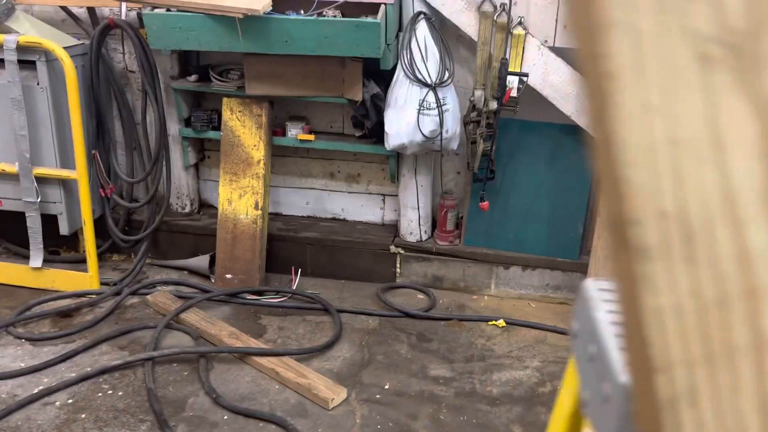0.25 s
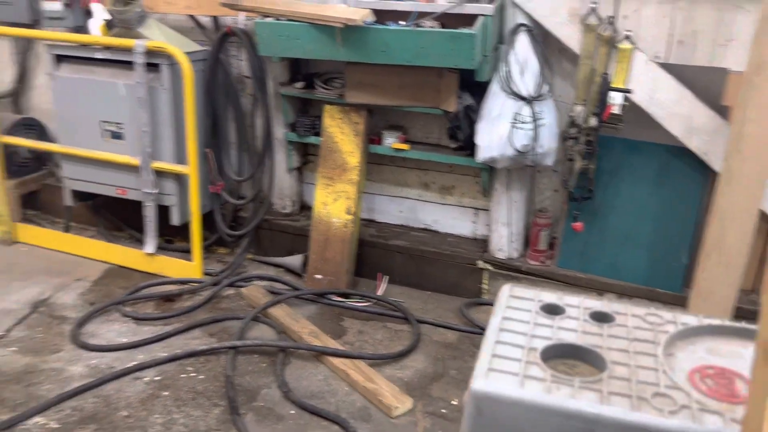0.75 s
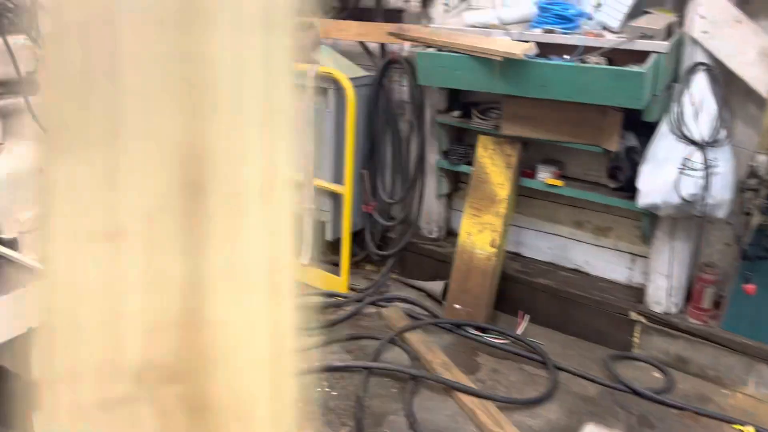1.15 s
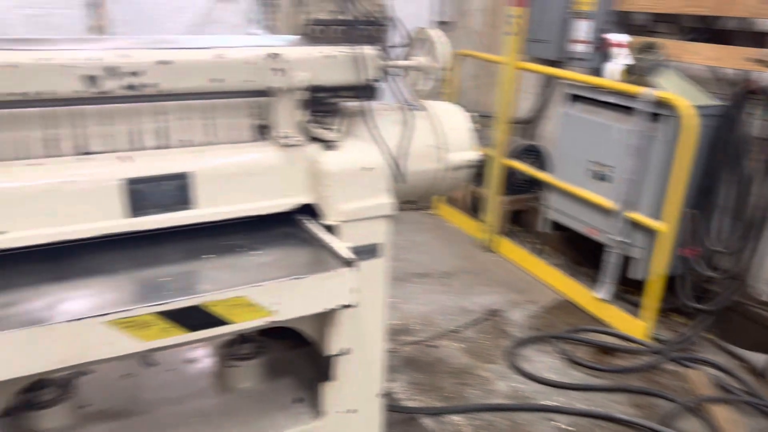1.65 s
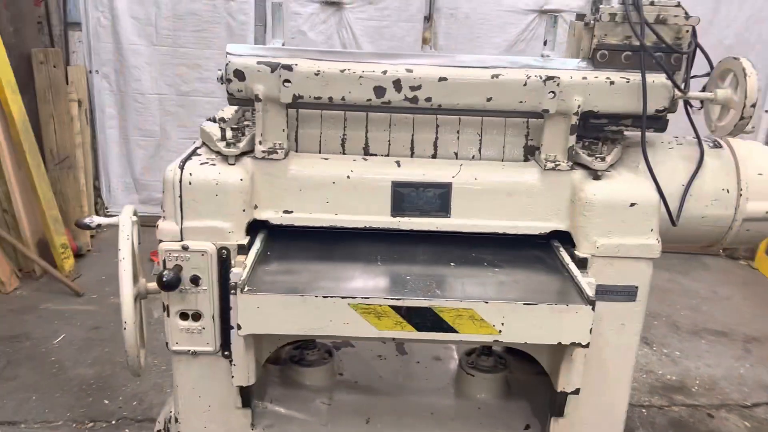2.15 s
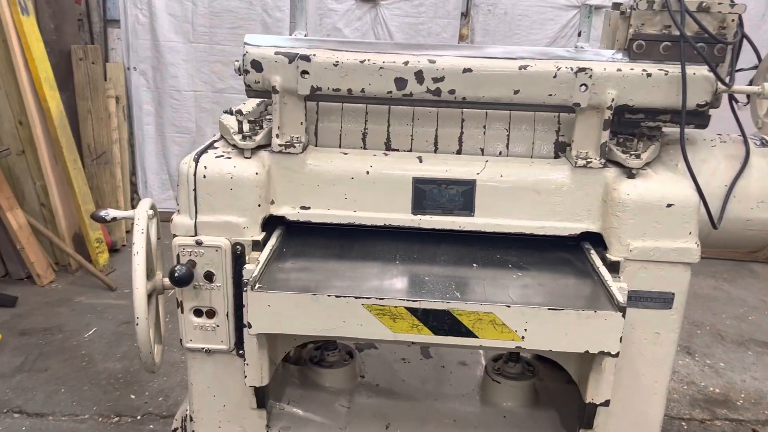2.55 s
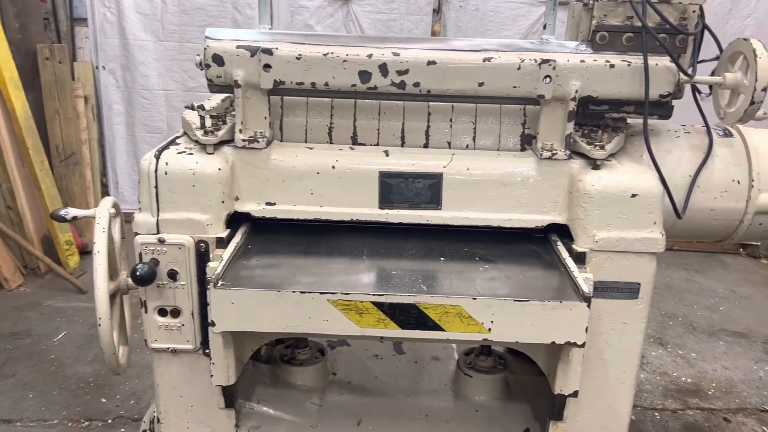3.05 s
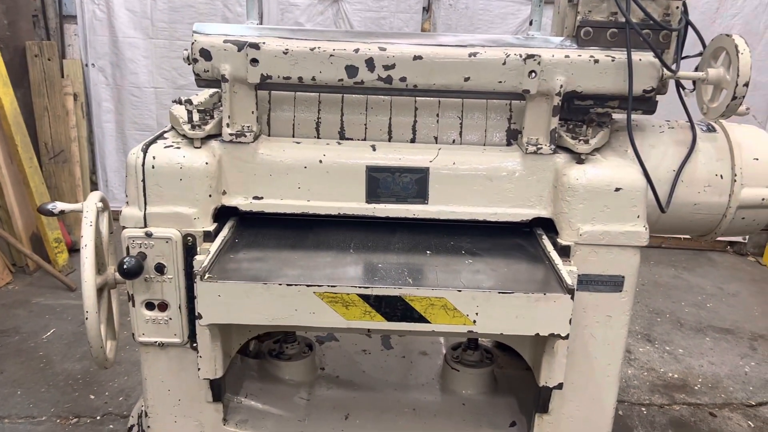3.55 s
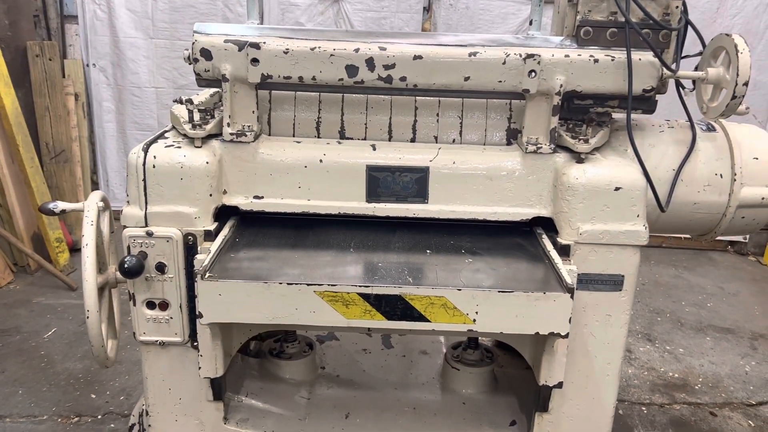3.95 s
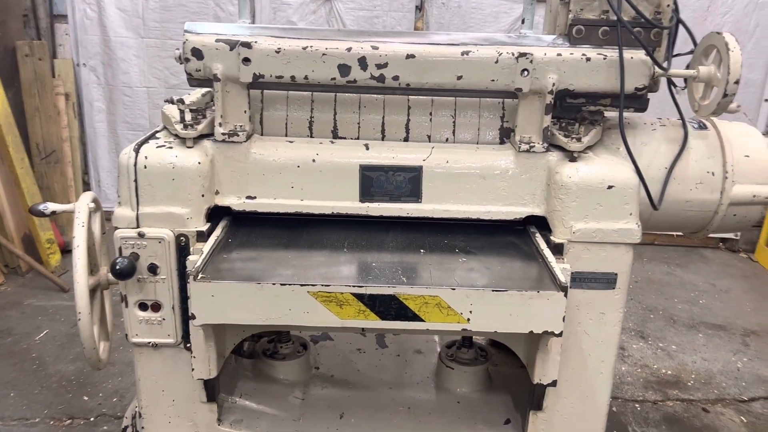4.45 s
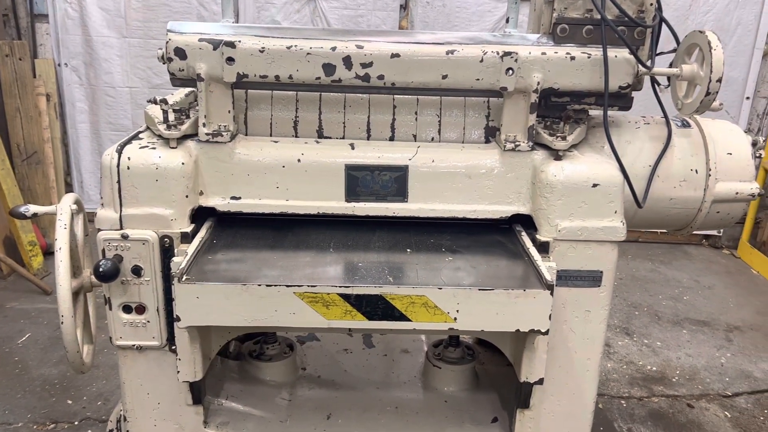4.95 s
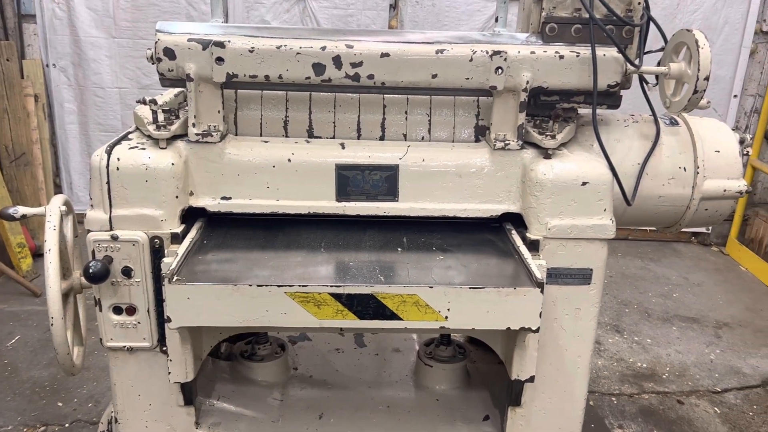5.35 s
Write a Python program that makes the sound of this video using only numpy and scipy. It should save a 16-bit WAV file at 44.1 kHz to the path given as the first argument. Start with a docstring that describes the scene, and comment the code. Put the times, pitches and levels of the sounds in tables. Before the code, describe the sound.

Steady low electric drone of an idling thickness planer in a workshop, airy and faintly whining, with a single soft plank knock near the start.

```python
"""A thickness planer idles in a workshop, heard by two microphones carried up to it.
At first the machine lies to the left: its hum and air are coloured by distance, and a thin whistle is loud.
At 0.6 s a wooden plank is knocked: a sum of decaying bending modes, soon stopped by the grip.
By 2.1 s the microphones face the machine: the knives' harmonics have moved to the centre through quiet
and loud spots. The hum stays, with shaft, motor and bearing tones over puffing, filtered noise for air."""
import sys
import numpy as np
from scipy import signal
from scipy.fft import rfft, irfft
from scipy.io import wavfile
from scipy.ndimage import uniform_filter1d

SR = 44100
rng = np.random.default_rng(int(sys.argv[2]) if len(sys.argv) > 2 else 0)


def persist_wave(psi):
    """Save psi, clipped to +-1, as 16-bit WAV."""
    counts = np.round(np.clip(psi, -1, 1) * 32767).astype(np.int16)
    wavfile.write(sys.argv[1], SR, np.atleast_2d(counts).T)


N = 247842
TIME = np.arange(N) / SR  # s
SHAFT_HZ = 59.74
KNIFE_HZ = 3 * SHAFT_HZ  # three knives pass the lip in each turn


def amp(db):
    """Decibels to gain."""
    return 10 ** (np.asarray(db) / 20)


def evened(x):
    """Scales to rms 1."""
    return x / np.sqrt(np.mean(abs(x) ** 2) + 1e-20)


def read(points, hz):
    """Reads a table of values against frequency on a logarithmic frequency axis."""
    f, value = np.transpose(points)
    return np.interp(np.log(hz + 1), np.log(f + 1), value)


def drift(rate_hz):
    """Smooth random motion of rms 1, mostly slower than the rate."""
    points, points_per_s = 4096, 500
    hz = np.fft.rfftfreq(points, 1 / points_per_s)
    slow = irfft(rfft(rng.standard_normal(points)) / (1 + (hz / rate_hz) ** 4))
    return np.interp(TIME, np.arange(points) / points_per_s, evened(slow))


# Distance from the machine: (time [s], distance [1 at the start of the walk, 0 in front of the machine])
DISTANCE = [(0, 0.94), (.5, 0.82), (1, .62), (1.5, .4), (2, 0.15), (2.6, 0.07), (5.6, 0)]


def away(t):
    """Relative distance of the microphones from the machine at times t."""
    return np.interp(t, *np.transpose(DISTANCE))


def aside(t, facing_s=2.13, turn_s=1.64):
    """1 while the machine lies to the left, 0 once the microphones have turned to it."""
    return np.clip((facing_s - t) / turn_s, 0, 1)


# Level difference of the two microphones: (frequency [Hz], left minus right [dB])
MIC_LEAN = [(60, 2), (180, 2), (330, 0.5), (600, 0.5), (850, 0.5), (1080, 1), (1255, 0), (1435, 5.5),
            (1650, 1), (3200, 1.4), (4400, 5), (7000, 3.5), (8200, 0), (15000, 0)]
# Phase difference of the two microphones: (frequency [Hz], lead of the left [rad])
MIC_LEAD = [(180, -0.06), (260, -0.19), (360, 0.25), (540, -0.13), (715, 0.85), (820, 0.44), (1075, 0.18),
            (1550, -0.74), (2100, 0.36), (3300, 1), (4200, 0.93), (8000, -0.12), (12000, -0.5)]


def ports(hz):
    """Complex gain of the left and the right microphone, half the difference to each."""
    half = (np.log(amp(read(MIC_LEAN, hz))) + 1j * read(MIC_LEAD, hz)) / 2
    return np.array([np.exp(half), np.exp(-half)])


def tone(hz, db, clock, lead=0, lean_db=0):
    """A stereo sine of random phase and given rms level that follows the machine's clock."""
    sides = np.array([[1], [-1]]) / 2
    phase = 2 * np.pi * (hz * clock + rng.random()) + sides * (read(MIC_LEAD, hz) + lead)
    side_gain = amp(sides * (read(MIC_LEAN, hz) + lean_db))
    return np.sqrt(2) * amp(db) * side_gain * np.cos(phase)


# Quiet and loud spots of the room's standing waves along the walk:
# (time [s], multiple of the knife rate, half length [s], left level [dB], right level [dB])
STANDING_WAVES = [(1.03, 1, .8, 0, 2), (.69, 2, .68, -6, -8), (1.81, 2, .45, -6, -7), (.2, 3, .3, 2, 2),
                  (.82, 3, .12, -9, -5), (1.3, 3, .08, -3, -3), (1.72, 3, .2, -2, 2),
                  (.05, 4, .16, -15, -8), (.28, 4, .06, 0, -12), (1.7, 4, .45, 3, -2),
                  (.25, 5, .12, -20, -3), (1, 5, .6, 3, -6), (1.99, 5, .18, -12, -6), (0, 6, .25, -7, -10),
                  (.7, 6, .3, -3, 0), (1.22, 6, .16, 3, 1.5), (1.85, 6, .5, 0, -4), (.06, 7, .15, 6, -10),
                  (.48, 7, .12, -3, -6), (.9, 7, .3, -7, 1), (1.36, 7, .15, -1, -19), (1.65, 7, .4, 4, 0),
                  (.13, 8, .14, -18, -6), (.48, 8, .13, -4, -7), (.82, 8, .25, 3, 3),
                  (1.12, 8, .08, -8, -5), (1.48, 8, .15, -11, -3), (1.89, 8, .09, -1, -13),
                  (1.3, 9, .3, 2, -8), (2.05, 9, .2, 4, 4), (.3, 10, .09, 5, 5), (.7, 10, .3, 4, -7),
                  (1.55, 10, .16, -12, -8), (1.85, 10, .15, 4, 4), (2.2, 10, .22, -11, -12),
                  (.35, 11, .23, -14, -9), (1.6, 11, .38, 3, -4), (.85, 12, .5, 7, 7), (1.9, 12, .3, 8, 8),
                  (.45, 13, .13, -20, -18), (1.36, 13, .4, -12, -10), (.85, 20, .12, 8, 5)]


def quiet_spots(k):
    """Dip or swell in dB of knife harmonic k at each microphone: one smooth bell for each spot passed."""
    return sum(np.array([[left], [right]]) * np.exp(-((TIME - s) / half) ** 2)
               for s, multiple, half, left, right in STANDING_WAVES if round(multiple) == k)


# Knife hum in front of the machine: (multiple of the knife rate, level relative to hum_db [dB])
KNIFE_HARMONICS = [(1, 0), (2, -13), (3, -7.5), (4, -22), (5, -23), (6, -13.5), (7, -24), (8, -26),
                   (9, -26.5), (10, -32.5), (11, -32), (12, -43.5), (13, -38.5), (14, -51), (15, -34),
                   (16, -34.5), (17, -45), (18, -44.5), (19, -43.5), (20, -40.5), (21, -45.5), (22, -44),
                   (23, -48)]
# Change of the hum at the start of the walk: (frequency [Hz], level [dB])
HUM_AFAR = [(179, -8.5), (358, 4.5), (538, -12.5), (717, -2.5), (896, -4.5), (1075, -7.5), (1255, 0.5),
            (1434, -2.5), (1613, -16), (1792, -4.5), (1971, -4.5), (2330, -2.5), (2700, -15), (3600, -7.5),
            (4300, -11)]
# Direct and reflected hum out of step, with the machine to the side: (frequency [Hz], lead of the left [rad])
HUM_SIDE_LEAD = [(180, 1.18), (360, 0.75), (540, 1.2), (900, 1.6), (1075, 2.5), (1255, -2.5), (1435, -1.5),
                 (1610, .5), (4300, 1)]


def cutterhead(clock, hum_db=-19, standing_db=5.0, fine_hz=2900, flutter_db=1.13, sway_db=.5, shadow_db=4):
    """Each knife squeezes the air at the table lip; the hum changes with distance and moves left to centre."""
    distance, side = away(TIME), aside(TIME)
    eddies, hum = drift(43), np.zeros((2, N))
    for multiple, db in KNIFE_HARMONICS:
        k = round(multiple)
        hz = k * KNIFE_HZ
        # short waves have many small nodes, met by chance
        speckle_db = standing_db * min(hz / fine_hz, 1) ** 2
        sway = (sway_db * np.log10(k) + speckle_db * distance) * drift(3.7)
        place_db = read(HUM_AFAR, hz) * distance + sway
        # eddies shake the upper harmonics most
        flutter = flutter_db * np.log10(k) * (drift(22) + 0.55 * eddies)
        # the lowest tone bends round the microphones, high ones arrive from all sides
        lean_db = shadow_db * side / np.sqrt(k / 2) * (k > 1)
        level_db = hum_db + db + place_db + flutter
        harmonic = tone(hz, level_db, clock, read(HUM_SIDE_LEAD, hz) * side, lean_db)
        hum += amp(quiet_spots(k)) * harmonic
    return hum


# Rushing air and rumble in front of the machine: (frequency [Hz], relative level per Hz [dB])
AIR_SPECTRUM = [(20, -27), (45, -31), (85, -10.5), (115, -4.5), (140, -2), (163, 6.5), (200, -13.5),
                (270, -13.5), (480, -6), (830, -15.5), (1900, -22.5), (4600, -30), (6000, -35.5),
                (7600, -36), (12000, -42), (15500, -40.5)]
# Change of the air at the start of the walk: (frequency [Hz], level [dB])
AIR_AFAR = [(50, -8), (110, -2), (300, -5), (600, -0.5), (900, -8.5), (1600, -3.5), (2800, -4.5), (4500, 0),
            (12000, -7.5)]
# Resonances of the hood and the frame:
# (frequency [Hz], width [Hz], level in front [dB], level at the start of the walk [dB])
HOOD_RESONANCES = [(231.6, 31, 10, 16.5), (329, 31, 6, 14), (485.4, 26.4, 8.5, 0.5), (666, 100, 4, 2),
                   (1124, 205, 8.5, 6), (1594, 89, 11, 4), (2143, 59, 3.5, 11), (2750, 330, 4, 1),
                   (8500, 830, 5.5, 10.5)]
# Likeness of the air noise at the two microphones: (frequency [Hz], correlation [1 = the same])
MIC_LIKENESS = [(100, 0.94), (270, 0.88), (500, 0.7), (800, 0.6), (1050, 0.55), (2100, 0.21), (2700, 0.64),
                (5600, 0.7), (8500, 0.11), (15000, 0.064)]


def air(clock, air_db=-33, patchy_db=1, chop=0.55, chop_band_hz=(1100, 3200)):
    """Turbulence as noise coloured by the hood; its middle band comes in puffs, one for each knife."""
    size, hop = 2048, 512  # samples
    hz, t = np.fft.rfftfreq(size, 1 / SR), np.arange(N // hop + 5) * hop / SR
    a, b, c, d, patches = rng.standard_normal((5, len(t), len(hz)))
    same, distance = np.clip(read(MIC_LIKENESS, hz), -1, 1), away(t)[:, None]
    # the right microphone shares part of the left one's noise
    left = a + 1j * b
    right = same * left + np.sqrt(1 - same ** 2) * (c + 1j * d)
    spectrum = np.array([left, right]) * ports(hz)[:, None]
    hood_db = sum((near + (far - near) * distance) / (1 + (2 * (hz - f) / width) ** 2)
                  for f, width, near, far in HOOD_RESONANCES)
    patches = uniform_filter1d(patches, size=6, axis=0)
    patches = evened(uniform_filter1d(patches, size=16, axis=1))
    afar_db = distance * read(AIR_AFAR, hz)
    spectrum *= amp(read(AIR_SPECTRUM, hz) + hood_db + afar_db + patchy_db * patches)
    rush = signal.istft(spectrum.transpose(0, 2, 1), nperseg=size, noverlap=size - hop)[1]
    rush = evened(rush[:, :N])
    band = signal.butter(2, chop_band_hz, "band", fs=SR, output="sos")
    middle = signal.sosfiltfilt(band, rush)
    puffs = chop * middle * np.cos(2 * np.pi * KNIFE_HZ * clock)
    return amp(air_db) * (rush + puffs)


# Bending modes of the plank: (frequency [Hz], level before the knock's own [dB], t60 [s], rise [s])
PLANK_MODES = [(329.5, -5, 0.7, 0.008), (389, -19, .2, .002), (523.5, -1.5, 0.33, 0.0005),
               (575, -3, .03, .0005), (608, -19, .2, .003), (665, -13, 0.08, .0006),
               (763, -7.5, 0.19, 0.0007), (790, -20, .2, .001), (1046, -11.5, 0.17, .001),
               (1570, -14, 0.15, 0.001), (1735, -21, 0.12, .003), (2148, -23, 0.12, .004)]
# The knock: (time [s], level [dB], time until the grip damps it [s])
PLANK_KNOCK = (.6055, -14, 0.057)


def plank(damp_s=0.0095, soft_hz=2200, room_db=-14, room_t60=0.29):
    """A dull blow rings the plank's bending modes until the grip stops them; the shop answers faintly."""
    s, db, held = PLANK_KNOCK
    t = np.arange(SR // 2) / SR
    ring = np.zeros((2, len(t)))
    for hz, level, t60, rise in PLANK_MODES:
        envelope = amp(level - 60 * t / t60) * (1 - np.exp(-t / rise))
        ring += envelope * (ports(hz)[:, None] * np.exp(2j * np.pi * hz * t)).imag
    blow = ring * np.exp(-np.maximum(t - held, 0) / damp_s)
    blow = signal.sosfilt(signal.butter(2, soft_hz, fs=SR, output="sos"), blow)  # soft wood gives no click
    tail = rng.standard_normal((2, len(t))) * amp(-60 * t / room_t60)
    answer = signal.fftconvolve(blow, tail / np.linalg.norm(tail[0]), axes=1)[:, :len(t)]
    blow = blow + amp(room_db) * answer
    return amp(db) * np.pad(blow, ((0, 0), (round(s * SR), N)))[:, :N]


# Unbalance and unequal knives: (multiple of the shaft rate, level in front [dB])
SHAFT_TONES = [(1, -47.5), (2, -52.5), (10, -56), (13, -51.5), (14, -58), (17, -43.5), (19, -49), (20, -51),
               (23, -57), (42, -61)]
# Fine buzz of the shaft: (frequency [Hz], level of each line in front [dB])
SHAFT_BUZZ = [(1700, -69), (2600, -69), (4000, -69.5), (5400, -72)]


def shaft(clock, far_db=-5.0, spread_db=2, standing_db=3, buzz_far_db=-7):
    """Tones at multiples of the turning rate, the higher fading more with distance, and a fine buzz."""
    distance = away(TIME)
    low = sum(tone(round(k) * SHAFT_HZ, db + far_db * np.log(k + 1) * distance, clock)
              for k, db in SHAFT_TONES)
    buzz = np.zeros((2, N))
    for k in range(29, 90):
        if k % 3 == 1:
            hz = k * SHAFT_HZ
            near_db = read(SHAFT_BUZZ, hz) + spread_db * rng.standard_normal()
            afar_db = buzz_far_db + standing_db * rng.standard_normal()
            buzz += tone(hz, near_db + afar_db * distance, clock, rng.normal(0, 1))
    return low + buzz


# The strongest bearing whistle: (time [s], level [dB])
WHISTLE_LEVEL = [(0, -57), (.17, -60), (.35, -60), (.95, -66), (1.2, -75), (1.5, -61), (2.2, -73),
                 (2.8, -63), (3.7, -66), (4.6, -76), (5.6, -68)]


def whistle(clock, whistle_hz=4818, flutter_db=3.0):
    """A thin, fluttering bearing whistle, a single sine, loud at first, that comes and goes."""
    level_db = np.interp(TIME, *np.transpose(WHISTLE_LEVEL)) + flutter_db * drift(22)
    return tone(whistle_hz, level_db, clock)


# Motor and bearing tones: (frequency [Hz], level in front [dB], level at the start of the walk [dB])
BEARING_TONES = [(29.8, -63, -65), (117.5, -49, -49), (488.9, -50, -56), (665.5, -43.5, -44),
                 (1117.8, -52, -62), (1470, -61, -66), (1574, -61, -68), (2115, -66, -61), (2175, -68, -65),
                 (2409, -72, -66), (2882, -63, -72), (2942, -65, -72), (4352, -64, -68), (4660, -70, -74),
                 (4840, -67, -74), (5171, -70, -78), (5582, -76, -73), (6115, -73, -80), (6882, -72, -80),
                 (8161, -77, -72), (8586, -75, -80), (8991, -74, -73), (9051, -74, -78), (9171, -74, -78),
                 (9702, -78, -84), (11170, -78, -81), (11633, -82, -78)]


def bearings(clock, waver_db=2, waver_hz=2500, slip_turns=0.034, far_db=-3,
             count=90, band_hz=(5300, 13000), sizzle_db=-81, spread_db=3):
    """Motor and bearing tones waver as the balls slip, over a thicket of fainter lines from the races."""
    distance = away(TIME)
    whine = np.zeros((2, N))
    for hz, near, far in BEARING_TONES:
        waver = waver_db * min(hz / waver_hz, 1) * drift(3.7)  # the high ones waver most in level
        slipping = clock + slip_turns * drift(3.3) / hz
        whine += tone(hz, near + (far - near) * distance + waver, slipping)
    place = (np.arange(count) + rng.random(count)) / count
    hz = np.interp(place, (0, 1), band_hz)
    phase = 2 * np.pi * rng.random(count) + rng.standard_normal((2, count))
    level = amp(sizzle_db + spread_db * rng.standard_normal(count))
    lines = np.zeros((2, N // 2 + 1), complex)
    lines[:, np.round(hz * N / SR).astype(int)] = ports(hz) * level * np.exp(1j * phase)
    sizzle = irfft(lines, N) * N / np.sqrt(2)
    return whine + amp(far_db * distance) * sizzle


def scene(wobble_s=.00002):
    """All turning parts share one clock, which runs very slightly unevenly."""
    clock = TIME + wobble_s * drift(2.3)
    machine = cutterhead(clock) + air(clock) + shaft(clock) + whistle(clock) + bearings(clock)
    return machine + plank()


def record(dry, edge_hz=15750):
    """The band limit of the recorder: a steep low-pass."""
    low_pass = signal.firwin(511, edge_hz, window=("kaiser", 9), fs=SR)
    return signal.oaconvolve(dry, low_pass[None], "same")


dry = scene()
out = record(dry)
persist_wave(out)
```